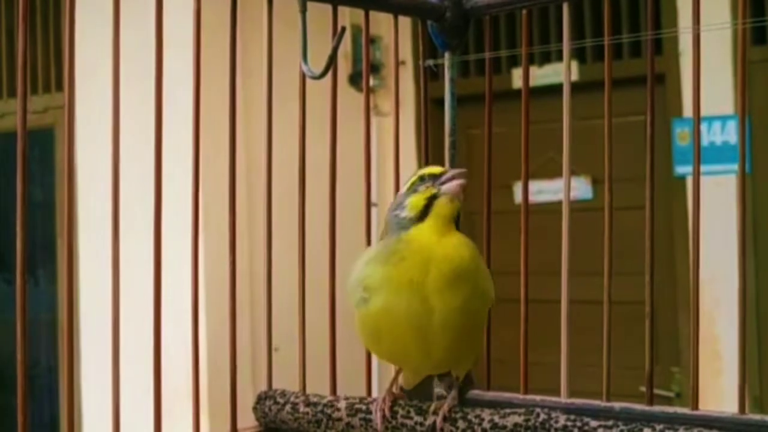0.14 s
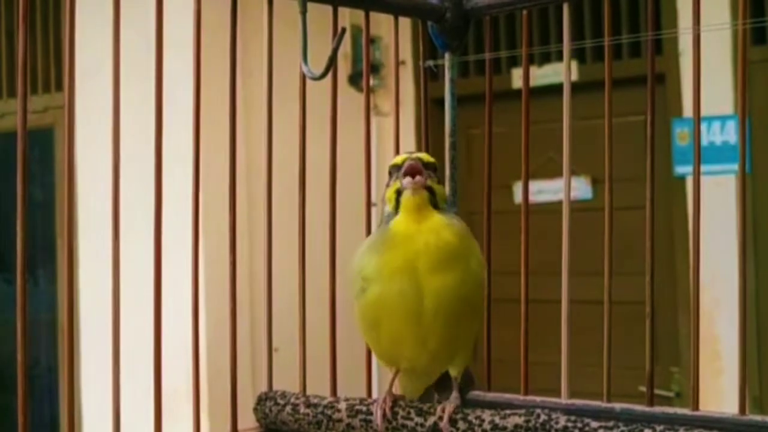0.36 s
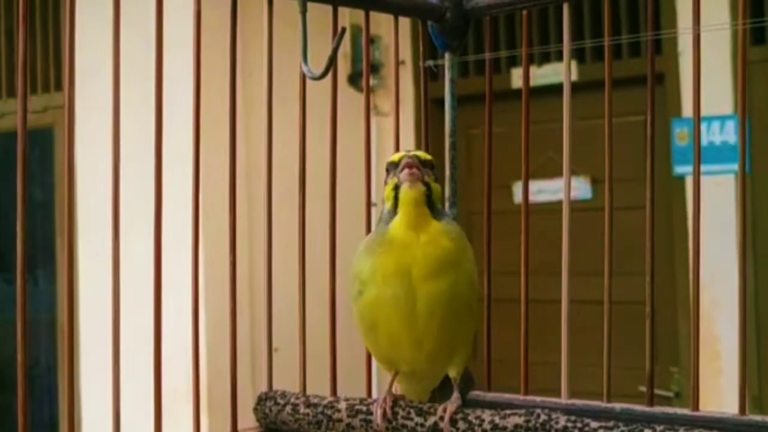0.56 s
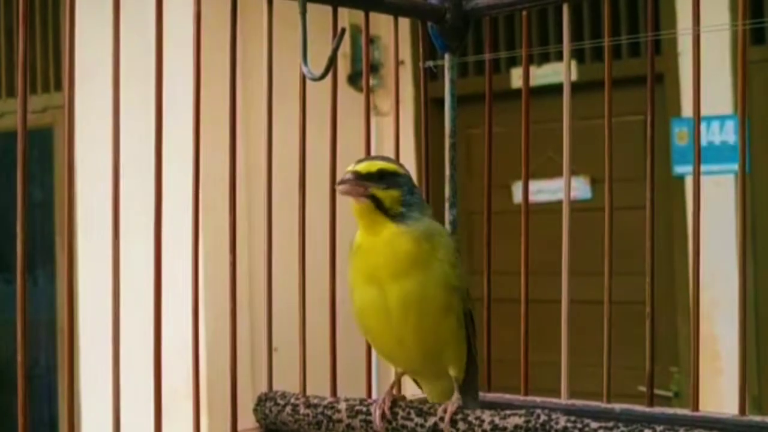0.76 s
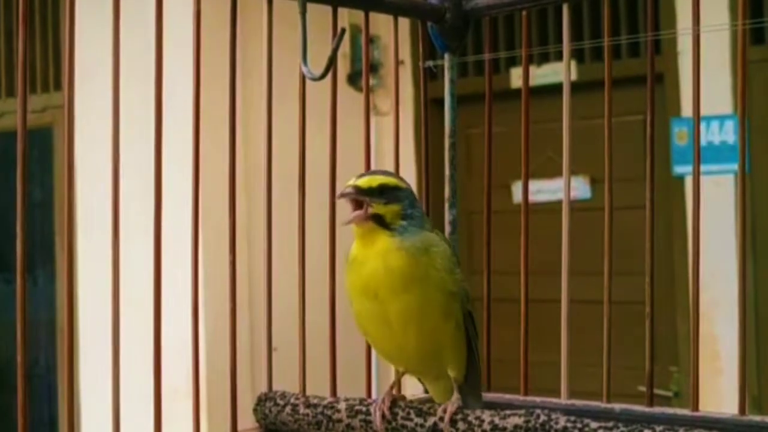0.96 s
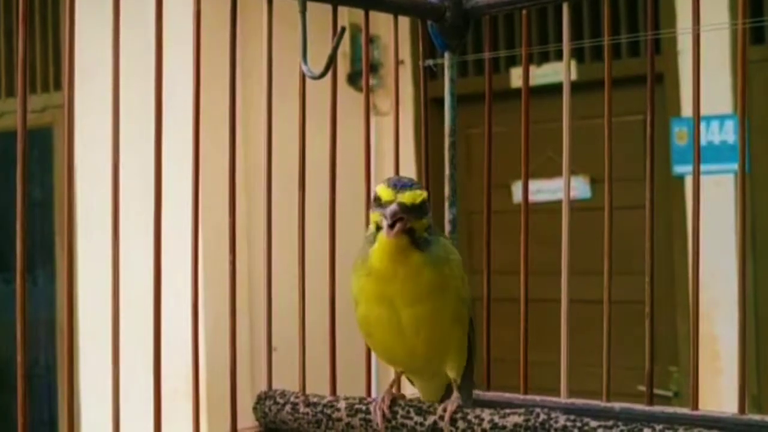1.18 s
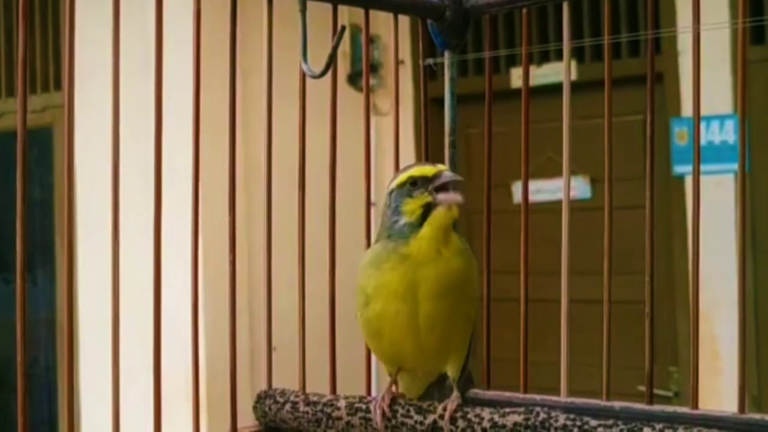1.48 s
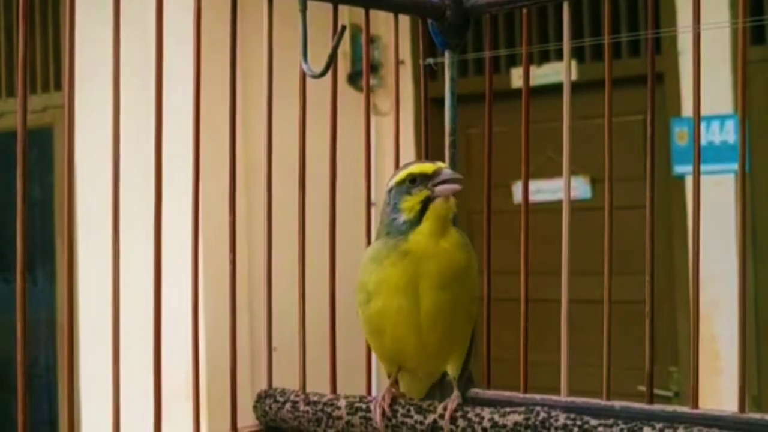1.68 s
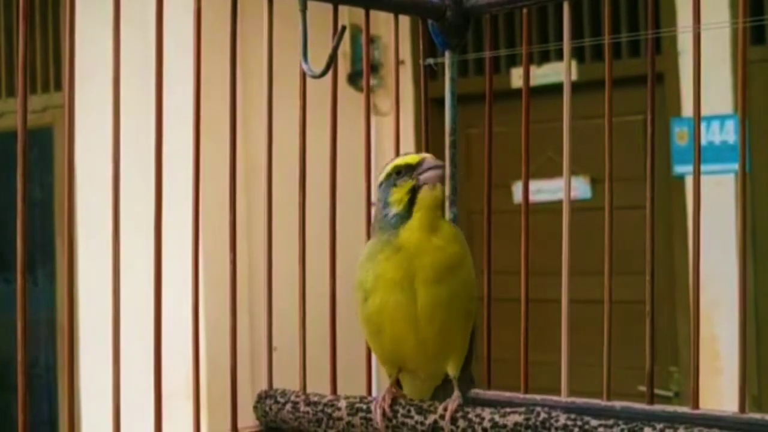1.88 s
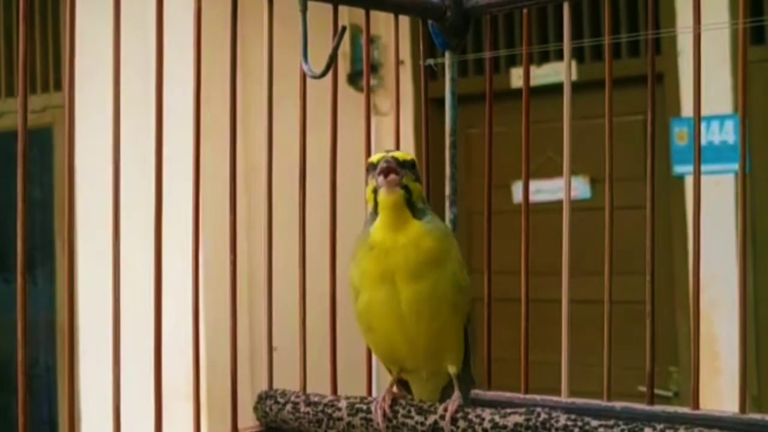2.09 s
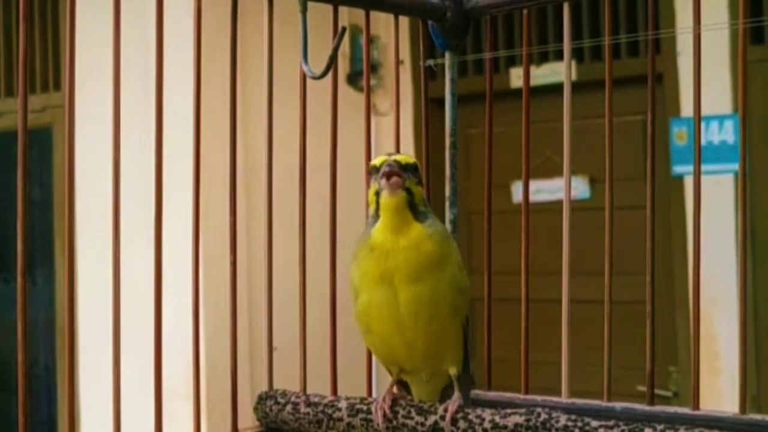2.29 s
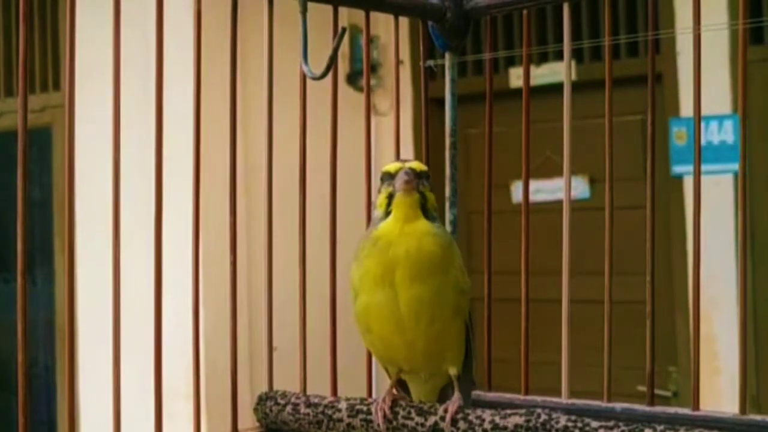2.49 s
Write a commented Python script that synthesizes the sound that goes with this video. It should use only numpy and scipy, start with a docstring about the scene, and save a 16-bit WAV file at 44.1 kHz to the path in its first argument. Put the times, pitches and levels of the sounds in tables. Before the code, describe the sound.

A caged canary sings quick, loud warbling notes, ending in a short trill.

```python
"""Over a faint low murmur, a caged canary sings close by in a small hard room: quick warbled notes,
a rising whistle, then a trill of seven upward chirps. Each note is a frequency-modulated, nearly pure
tone from one side of the syrinx; at times the second side overlaps it or takes over. The room
reverberates briefly and the loudest notes overload the recorder. A hash of patchy treble hiss and
rough overtones flares with loud, fast sweeps."""
import sys
import numpy as np
from scipy import signal
from scipy.fft import rfft, irfft
from scipy.io import wavfile
from scipy.ndimage import uniform_filter1d

SR = 44100
rng = np.random.default_rng(int(sys.argv[2]) if len(sys.argv) > 2 else 0)


def dump(signal):
    """Clip the signal to [-1, 1] and save it as 16-bit WAV at the path in sys.argv[1]."""
    limited = np.clip(np.atleast_2d(signal).T, -1, 1)
    pcm = np.round(limited * 32767).astype(np.int16)
    wavfile.write(sys.argv[1], SR, pcm)


N = 116865
TIME, FREQS = np.arange(N) / SR, np.fft.rfftfreq(N, 1 / SR)


def from_db(db):
    """Amplitude ratio: a factor of ten for every 20 dB."""
    return 10 ** (np.asarray(db) / 20)


def at_hz(points, hz):
    """Interpolation of (Hz, value) points on a logarithmic frequency axis."""
    table = np.array(points)
    return np.interp(np.log(hz + 1), np.log(table[:, 0]), table[:, 1])


def over_time(points):
    """Amplitude envelope interpolated through (seconds, dB) points."""
    return from_db(np.interp(TIME, *np.transpose(points)))


def coloured(spectrum, size):
    """Spectral shaping of white noise: two uncorrelated channels, rms 1."""
    gain = from_db(at_hz(spectrum, np.fft.rfftfreq(size, 1 / SR)))
    noise = irfft(rfft(rng.standard_normal((2, size))) * gain, size)
    return noise / noise.std()


# Spectrum of the background. Each row: frequency in Hz, relative spectral density in dB.
MURMUR_SPECTRUM = [(25, -54), (60, -12.5), (110, -15.5), (160, -5), (330, -3.5), (580, -9), (750, -9),
                   (1400, -17), (2000, -11), (3000, -18.5), (4800, -21), (5800, -19), (7000, -21),
                   (10700, -16), (12500, -20), (15500, -20.5)]
# Likeness of left and right. Each row: frequency in Hz, correlation from 0 to 1.
MURMUR_COHERENCE = [(40, 0.47), (160, 0.93), (300, 0.78), (700, 0.16), (1500, 0.033), (15000, 0.028)]
# Slow drift of the background. Each row: time in seconds, gain in dB.
MURMUR_SWELL = [(0, 2), (.35, 3), (.6, 2), (1.2, -0.5), (1.8, 1.5), (2.2, 0.5), (2.6, 1)]
def murmur(level_db=-45.5):
    """Partially coherent noise: the low murmur is much alike in both channels, its faint hiss is not."""
    mid, side = rfft(coloured(MURMUR_SPECTRUM, N))
    coherence = at_hz(MURMUR_COHERENCE, FREQS)
    spectrum = np.sqrt(1 + coherence) * mid + np.sqrt(1 - coherence) * side * [[1], [-1]]
    return from_db(level_db) * over_time(MURMUR_SWELL) * irfft(spectrum, N)


# Faint background tones. Each row: frequency in Hz, level in dB.
HUM_TONES = [(696, -58.5), (5800, -55)]
def hum():
    """Superposition of steady sinusoids."""
    return sum(from_db(db) * np.sin(2 * np.pi * hz * TIME) for hz, db in HUM_TONES)


def glide(times, values, t):
    """Monotone cubic interpolation: the curve flattens at each turn and never overshoots."""
    step = np.maximum(np.diff(times), 1 / SR)
    slope = np.diff(values) / step
    before, after = slope[:-1], slope[1:]
    inner = 2 * np.maximum(before * after, 0) * np.sign(after) / (abs(before) + abs(after) + 1e-12)
    tangent = np.r_[slope[0], inner, slope[-1]]
    k = np.clip(np.searchsorted(times, t) - 1, 0, len(step) - 1)
    u = np.clip((t - times[k]) / step[k], 0, 1)
    bend = (tangent[k] - slope[k]) * (1 - u) - (tangent[k + 1] - slope[k]) * u
    return values[k] + step[k] * u * (slope[k] + (1 - u) * bend)


# The throat's passing of harmonics 2 and 3. Each row: harmonic's frequency in Hz, relative level in dB.
SECOND_HARMONIC = [(3500, 20), (5000, -13.5), (6500, -43.5), (8000, -38), (10000, -25), (12500, -35),
                   (15000, -39)]
THIRD_HARMONIC = [(8000, -41), (10500, -63), (12000, -28), (12800, -35), (15000, -25.5), (18000, -50)]
# The octave flashes through the throat at sharp pitch dips. Each row: time in seconds, strength in dB.
OCTAVE_FLASHES = [(0.345, 10), (0.861, 8), (1.398, 9.5)]
def whistle(t, hz, level, flash_s=0.0072, throat_top_hz=7300):
    """Source and filter: the throat weights the syrinx's harmonics. Returns fundamental, overtones."""
    phase = 2 * np.pi * np.cumsum(hz) / SR
    flash = sum(from_db(db) * np.exp(-((t - s) / flash_s) ** 2) for s, db in OCTAVE_FLASHES)
    second = from_db(at_hz(SECOND_HARMONIC, 2 * hz)) + flash / (1 + (2 * hz / throat_top_hz) ** 16)
    third = from_db(at_hz(THIRD_HARMONIC, 3 * hz))
    return level * np.array([np.sin(phase), second * np.sin(2 * phase) + third * np.sin(3 * phase)])


def rough_overtones(hz, shake_hz=380):
    """Amplitude modulation by noise spreads harmonics 2 and 3 into bands that follow the pitch."""
    phase = 2 * np.pi * np.cumsum(hz) / SR
    lowpass = signal.butter(2, shake_hz, fs=SR, output="sos")
    shake = signal.sosfilt(lowpass, rng.standard_normal((2, 2, len(hz))))
    return sum(noise / noise.std() * np.sin(k * phase) for k, noise in enumerate(shake, start=2))


HASH_SMOOTH_SAMPLES = int(0.025 * SR)
# Notes of the warble, one list of turning points for each note; the second list holds further notes, some
# overlapping others. # Each point: time in seconds, pitch in Hz, relative level in dB.
WARBLE_NOTES = [
    [(.191, 5690, -15), (.197, 5080, -18.5), (.205, 3350, -17), (.209, 3047, -14.5), (.217, 5020, -5.5),
     (.227, 5974, -3), (.240, 4540, -3.5), (.253, 3514, -9), (.262, 4380, -3.5), (.271, 5650, -19)],
    [(0.3272, 4510, -21), (0.3379, 5930, -5.5), (0.3455, 3165, -24.5), (0.3565, 5630, 4),
     (0.3661, 6154, -4), (0.3714, 5670, 6), (0.3861, 3650, -23.5), (0.4022, 5470, -5)],
    [(.435, 4590, 1), (.444, 4500, -14), (.452, 3224, -15), (.461, 2960, -12), (.469, 3754, 0),
     (.476, 4445, -3), (.486, 3737, 5.5), (.495, 3376, -4.5), (.507, 2960, -36)],
    [(0.5376, 4170, -15), (0.5481, 4480, -8.5), (0.5568, 3300, -16), (0.5665, 4170, -8),
     (0.572, 5010, -11.5), (0.5861, 3790, -10.5), (0.6041, 2820, -17.5), (0.6102, 3140, -4.5),
     (0.6178, 4150, -3.5), (0.6335, 3353, 5), (0.6481, 2710, -10), (0.6595, 2484, -14), (0.6695, 2300, -28)],
    [(.723, 5000, -2), (.729, 4280, -11), (.735, 3110, -24.5), (.742, 2350, -24)],
    [(0.7497, 2775, -15), (0.7598, 3547, -10), (0.7677, 4527, -2.5), (0.7768, 3990, -1.5),
     (0.7875, 3310, 3.5), (0.7988, 2894, -8.5), (0.8079, 2600, -12.5), (0.8185, 2523, -20)],
    [(0.8429, 6590, 6), (0.8491, 7180, -21), (0.8524, 5243, -5), (0.8588, 3356, -18), (0.8675, 5920, -2),
     (0.8778, 7040, -7), (0.8983, 6565, -1), (0.9152, 6370, 1.5), (0.9236, 6040, 0), (0.9363, 4357, -6),
     (0.9451, 4590, -5.5), (0.9526, 6100, -43)],
    [(0.9855, 7160, -61), (0.9893, 6790, -2), (0.9965, 4250, -16), (1.004, 6120, -0.5),
     (1.0099, 6770, -6.5), (1.0249, 6560, -4), (1.0316, 6000, -1), (1.0442, 4250, -15),
     (1.0575, 5930, -6.5), (1.0624, 5700, -2)],
    [(1.1342, 7840, 2), (1.1382, 6420, 0), (1.1454, 4446, -6), (1.1533, 6420, -3), (1.1604, 6720, -1.5),
     (1.1751, 6200, -8), (1.1806, 6020, -0.5), (1.1957, 3750, -22), (1.2119, 5130, -6)],
    [(1.3847, 6560, -36), (1.3903, 7060, -2.5), (1.3979, 3560, -16), (1.4078, 6260, -2.5),
     (1.4168, 6810, -6), (1.4248, 6310, -9), (1.4348, 5720, -0.5), (1.4415, 5100, -46)],
    [(1.6186, 5460, -13), (1.6268, 4520, -11), (1.6352, 4077, -12), (1.6404, 4440, -3),
     (1.6489, 5684, -8.5), (1.6592, 4590, -4.5), (1.6753, 3490, -6), (1.6831, 4316, -2.5),
     (1.6932, 5320, -3), (1.7071, 4355, 1), (1.7172, 3900, -10.5), (1.729, 3800, -41)],
    [(1.7652, 5050, -17), (1.7729, 4400, -14), (1.7816, 3210, -9), (1.7909, 2913, -10.5),
     (1.7951, 3146, -2), (1.8033, 4405, -4), (1.8128, 3710, 0), (1.8213, 3237, -1.5), (1.8339, 2520, -20)],
    [(1.841, 2230, 1), (1.847, 2780, -9), (1.854, 3112, 2.5), (1.863, 3420, -1), (1.878, 3798, 9.5),
     (1.895, 3900, 2.5), (1.906, 3890, -6), (1.911, 3840, -23.5)],
]
MORE_WARBLE_NOTES = [
    [(0.3795, 6510, -37), (0.3903, 5930, -7.5), (0.3988, 5890, -11.5), (0.4072, 5200, -13)],
    [(.494, 5070, 7), (.500, 3825, -8.5), (.507, 3110, -10.5)],
    [(.540, 4000, -43), (.548, 3900, -22), (.554, 3570, -24)],
    [(.571, 5060, -15), (.578, 5040, -24), (.586, 4560, -35)],
    [(.754, 3630, 9), (.761, 4350, -15), (.768, 4800, -13)],
    [(0.8827, 6460, -23), (0.8957, 6270, -3), (0.9069, 5700, 7.5), (0.9169, 6230, -7)],
    [(1.0388, 7960, -11), (1.0495, 7000, -10.5), (1.062, 6300, -11), (1.0692, 5930, -3), (1.0832, 4276, -5),
     (1.0901, 4510, -5.5), (1.0971, 5730, -6)],
    [(1.1682, 6770, -6), (1.185, 7140, -16.5), (1.2003, 6530, -8.5), (1.2151, 5725, -2),
     (1.2252, 4270, -6.5), (1.2377, 3480, -13.5), (1.2425, 3670, -14), (1.2471, 4160, -5),
     (1.2558, 5090, -9), (1.276, 5480, -6), (1.291, 5230, -3.5), (1.3038, 4360, 0.5), (1.3187, 4100, -1),
     (1.3345, 4260, -39)],
    [(1.249, 4550, -22), (1.254, 3910, -13), (1.262, 3780, -18)],
    [(1.4149, 7130, -11), (1.4285, 6960, -10), (1.4372, 8090, -18), (1.4416, 6490, 4), (1.4489, 4830, -5),
     (1.4601, 6560, -3.5), (1.4728, 6940, -6.5), (1.4923, 6605, -1), (1.4998, 5730, -1), (1.5135, 4240, -6),
     (1.5271, 5840, -2), (1.5416, 6120, -11), (1.5499, 5880, -1), (1.5645, 4347, -2), (1.5735, 4190, -12),
     (1.5835, 4350, -26)],
    [(1.524, 5090, -16), (1.537, 4480, -8.5), (1.547, 4320, -32)],
    [(1.687, 3960, -3), (1.693, 3760, -7), (1.699, 3420, -25.5)],
    [(1.826, 3570, -8), (1.832, 3096, -13), (1.839, 2140, -25)],
]
def warble(gain_db=-0.5, attack_s=0.008, release_s=0.0007, rough_db=-33, hiss_db=-25.5):
    """Frequency modulation: notes glide through their points. Returns tone, roughness, hiss gain."""
    tone, rough, hiss_gain = np.zeros((2, N)), np.zeros((2, N)), np.zeros(N)
    for note in WARBLE_NOTES + MORE_WARBLE_NOTES:
        times, pitch, db = np.array(sorted(note), float).T
        span = np.arange(int(times[0] * SR), int(times[-1] * SR))
        t = span / SR
        hz = glide(times, pitch, t)
        fade = np.clip(np.minimum((t - times[0]) / attack_s, (times[-1] - t) / release_s), 0, 1)
        level = fade * from_db(gain_db + glide(times, db, t))
        sweep_hz_per_s = uniform_filter1d(abs(np.gradient(hz)) * SR, HASH_SMOOTH_SAMPLES)
        sweep_weight = 0.32 + np.tanh(sweep_hz_per_s / 110000)   # a little hash stays on held pitches
        hash_gain = sweep_weight * (hz / 4450) ** 0.21 * level ** 0.65
        tone[:, span] += whistle(t, hz, level)
        rough[:, span] += from_db(rough_db) * hash_gain * rough_overtones(hz)
        hiss_gain[span] += from_db(hiss_db) * hash_gain
    return tone, rough, hiss_gain


# Hiss riding on the tone. Each row: frequency in Hz, relative spectral density in dB.
HISS_SPECTRUM = [(300, -18.5), (1500, -6.5), (3000, -4.5), (6000, 1.5), (8500, -3), (11000, -1),
                 (14000, -0.5), (15300, -1), (16200, -25)]
def uneven_hiss(bands=12, flicker_db=5, flicker_per_s=70):
    """Random amplitude modulation: each band of the hiss swells and sinks independently; rms 1."""
    spectrum = rfft(coloured(HISS_SPECTRUM, N))
    band = np.arange(len(FREQS)) * bands // len(FREQS)
    hiss = np.zeros((2, N))
    for k, draws in enumerate(rng.standard_normal((bands, 1000))):
        flicker = np.interp(TIME * flicker_per_s, np.arange(len(draws)), draws)
        hiss += irfft(spectrum * (band == k), N) * from_db(flicker_db * flicker)
    return hiss / hiss.std()


# Strength of the treble hash during the warble. Each row: time in seconds, gain in dB.
HASH_SWELL = [(.2, 2.5), (.38, 0), (.55, -2.5), (.75, 0.5), (.95, -1), (1.18, 2), (1.3, 3.5), (1.42, -1),
              (1.55, 0.5), (1.68, 0), (1.84, -6), (1.875, -11.5)]
def treble_hash(rough, warble_gain, trill_gain):
    """Modulation noise: patchy treble hiss and rough overtones that flare with loud, fast sweeps."""
    swell = over_time(HASH_SWELL)
    envelope = uniform_filter1d(swell * warble_gain + trill_gain, HASH_SMOOTH_SAMPLES)
    return swell * rough + envelope * uneven_hiss()


# Top treble added to hash and overtones. Each row: time in seconds, gain of the added band in dB.
TREBLE_FLARE = [(.2, -21), (.8, -24), (1.0, -12), (1.2, -6), (1.45, 4), (1.7, -6), (1.9, -22)]
def brightened(x, edge_hz=12500):
    """Time-varying shelf filter: the top treble flares in the high middle part of the song."""
    treble = signal.sosfiltfilt(signal.butter(4, edge_hz, "high", fs=SR, output="sos"), x)
    return x + over_time(TREBLE_FLARE) * treble


def interference(x, bands):
    """Interference: nearby reflections cancel some narrow bands and slightly reinforce others."""
    for hz, width_hz, db in bands:
        x = x + (from_db(db) - 1) * signal.lfilter(*signal.iirpeak(hz, hz / width_hz, fs=SR), x)
    return x


# Dips and peaks at each microphone. Each row: centre in Hz, width in Hz, gain in dB.
LEFT_BANDS = [(4827, 340, 0.5), (5100, 120, -20)]
RIGHT_BANDS = [(2705, 73, -10.5), (3574, 188, -66.5), (4270, 69, 1), (5230, 320, 1.5), (6820, 700, 3)]
def direct_sound(x, left_lag_s=0.000027):
    """Path difference: sound reaches the left microphone later, and glides dip as they cross notches."""
    late = irfft(rfft(x) * np.exp(-2j * np.pi * FREQS * left_lag_s), N)
    return np.array([interference(late, LEFT_BANDS), interference(x, RIGHT_BANDS)])


# Spectrum of the room's reflections. Each row: frequency in Hz, relative level in dB.
ROOM_COLOUR = [(1000, -1), (2700, 3.5), (3400, -5), (3950, 0), (4600, 4.5), (6500, -3.5), (8000, -5),
               (15000, -5)]
def room(x, level_db, t60_s, build_s=0.0015):
    """Reverberation: dense reflections decay exponentially, uncorrelated in the two channels."""
    t = np.arange(SR // 2) / SR
    response = coloured(ROOM_COLOUR, len(t)) * from_db(-60 * t / t60_s) * np.clip(t / build_s, 0, 1)
    response /= np.sqrt(np.sum(response ** 2, axis=1, keepdims=True))
    return from_db(level_db) * signal.fftconvolve(np.atleast_2d(x), response, axes=1)[:, :N]


# The closing trill. Each row: start in seconds, length in seconds, top pitch in Hz, relative level in dB.
CHIRPS = [(1.9478, 0.039, 3993, 3), (2.0078, 0.043, 3982, 2), (2.07, 0.04, 4064, 3),
          (2.133, 0.045, 3990, 2), (2.198, 0.041, 4050, 3), (2.264, 0.044, 3976, 2.5),
          (2.3340, 0.046, 3937, 2.5)]
def trill(start_hz=1680, rise_s=0.0072, sag_hz=50, attack_s=0.0093, release_s=0.014):
    """Frequency sweeps: each chirp shoots up, levels off and droops. Returns tone and hiss gain."""
    tone, hiss_gain = np.zeros((2, N)), np.zeros(N)
    for start, length, top_hz, db in CHIRPS:
        span = np.arange(int(start * SR) + 1, int((start + length) * SR))
        age = span / SR - start
        hz = top_hz + (start_hz - top_hz) * np.exp(-(age / rise_s) ** 1.345)
        onset_db = -42 * np.maximum(1 - age / attack_s, 0) ** 1.27
        release = np.sin(np.pi / 2 * np.clip((length - age) / release_s, 0, 1)) ** 2
        level = from_db(db + onset_db) * release
        tone[:, span] += whistle(span / SR, hz - sag_hz * (1 - release), level)
        hiss_gain[span] += from_db(-42) * level ** 0.5
    return from_db(-2) * tone, hiss_gain


def scene():
    """Superposition of the background, the bird's direct sound, the treble hash and the reflections."""
    background = murmur() + hum()
    notes, rough, warble_gain = warble()
    chirps, trill_gain = trill()
    hiss = brightened(treble_hash(rough, warble_gain, trill_gain))
    tone, overtones = notes + chirps
    overtones = brightened(overtones)
    early = room(tone, level_db=-17.5, t60_s=0.058)
    tail = room(tone, level_db=-19, t60_s=0.49)
    sheen = room(overtones, level_db=-4, t60_s=0.09) + room(hiss, level_db=-16.5, t60_s=0.19)
    return background + direct_sound(tone + overtones) + hiss + early + tail + sheen


def record(dry, limit_db=1.92, release_db_per_s=370.5, hardness=6.3, cutoff_hz=15600):
    """Nonlinear overload: a fast limiter and soft clipping hold the peaks; a low-pass cuts the top."""
    fall = release_db_per_s * TIME
    excess_db = np.maximum(20 * np.log10(abs(dry) + 1e-9) - limit_db, 0)
    reduction_db = np.maximum.accumulate(excess_db + fall, axis=1) - fall
    x = dry * from_db(-uniform_filter1d(reduction_db, size=88))
    x = x / (1 + abs(x) ** hardness) ** (1 / hardness)
    # The overload is slightly asymmetric, so loud notes leave a soft thump.
    x = x + 0.01 * signal.sosfilt(signal.butter(1, 40, "high", fs=SR, output="sos"), x ** 2)
    return signal.sosfilt(signal.ellip(12, .1, 70, cutoff_hz, fs=SR, output="sos"), x)


dry = scene()
out = record(dry)
dump(out)
```